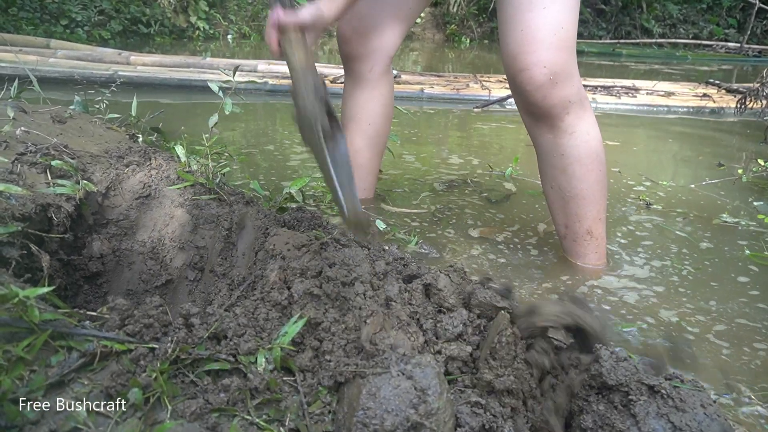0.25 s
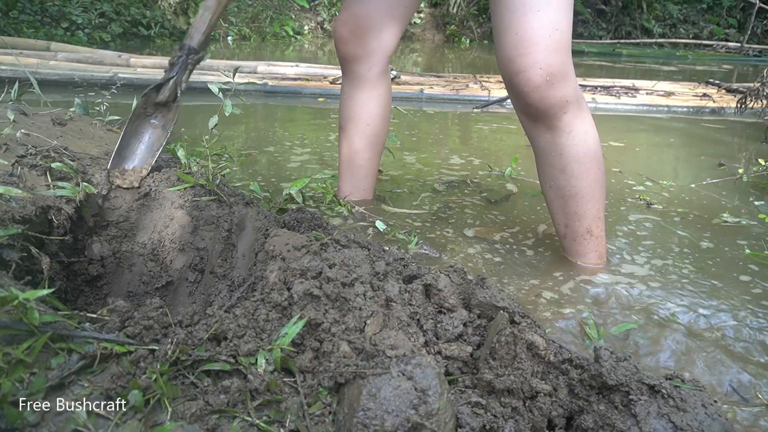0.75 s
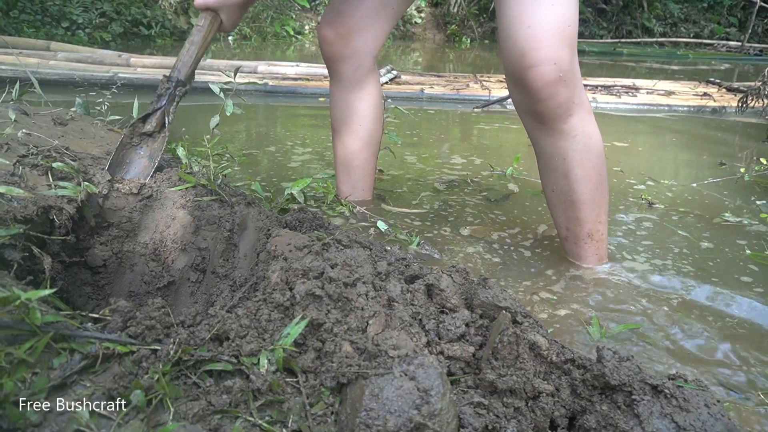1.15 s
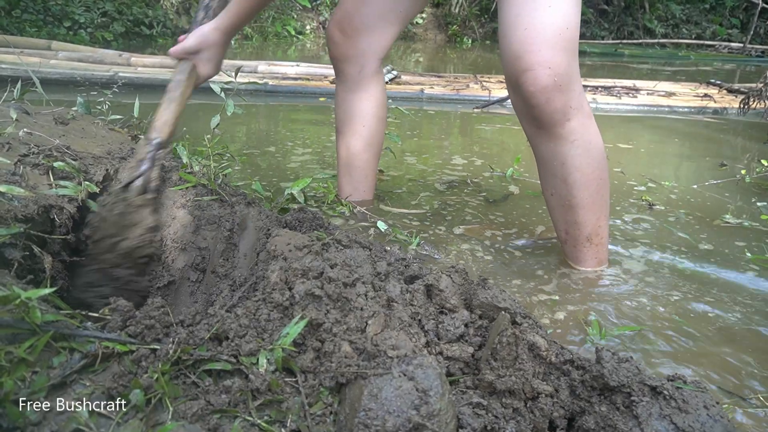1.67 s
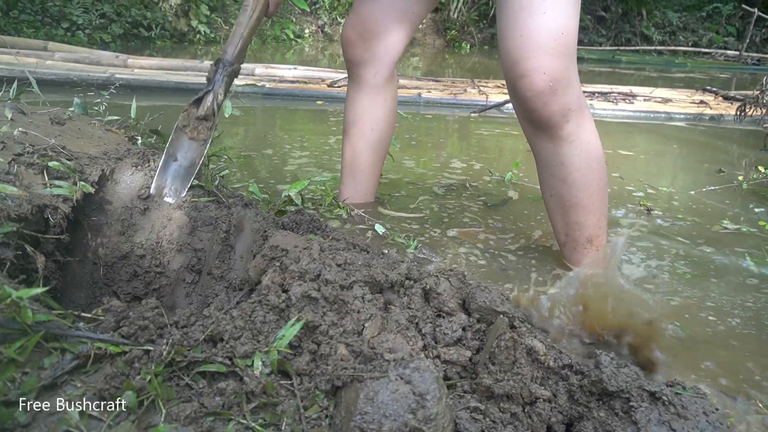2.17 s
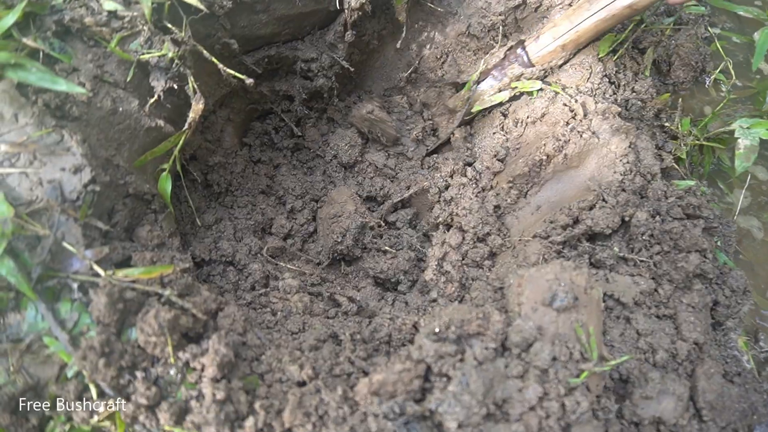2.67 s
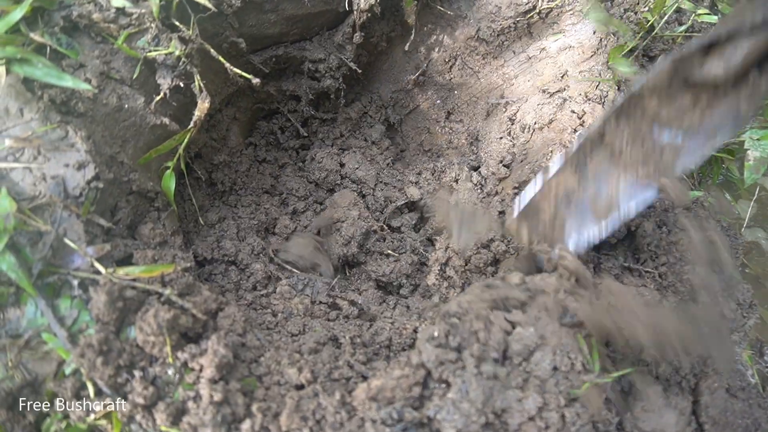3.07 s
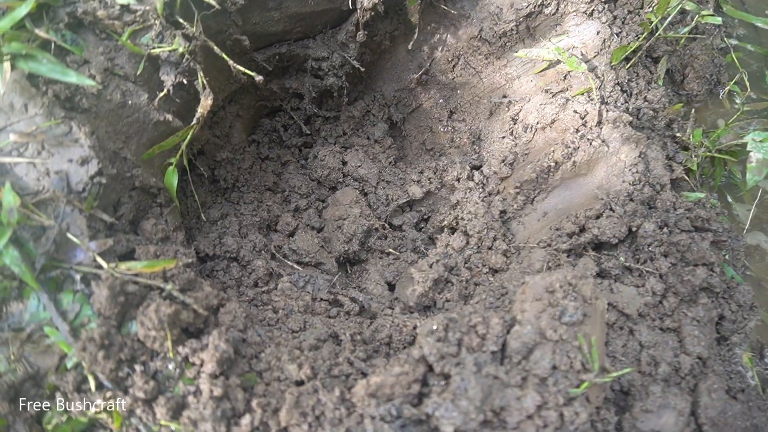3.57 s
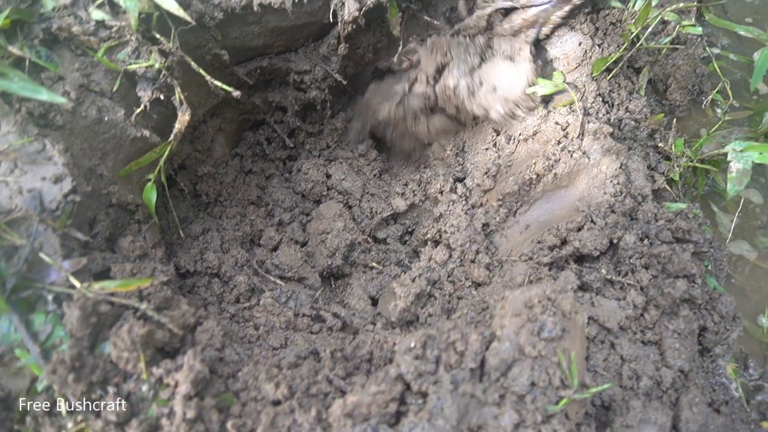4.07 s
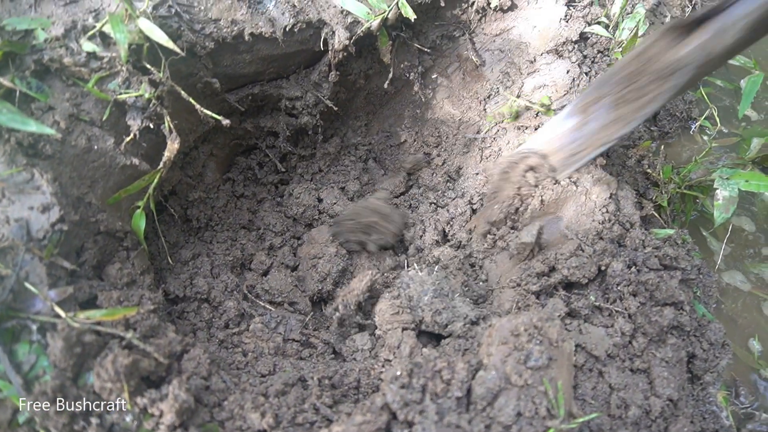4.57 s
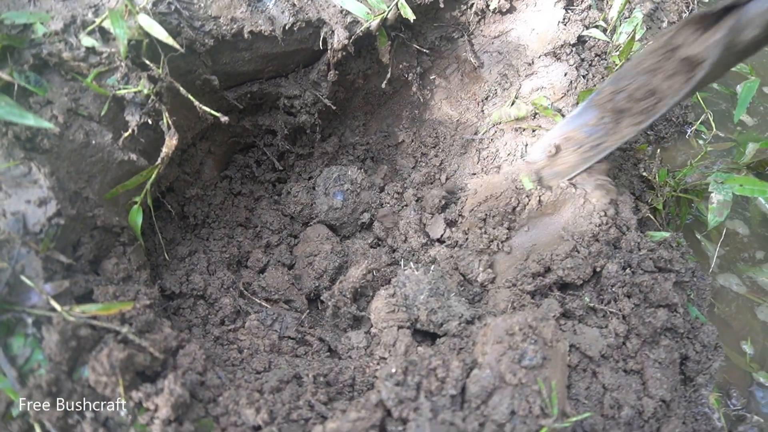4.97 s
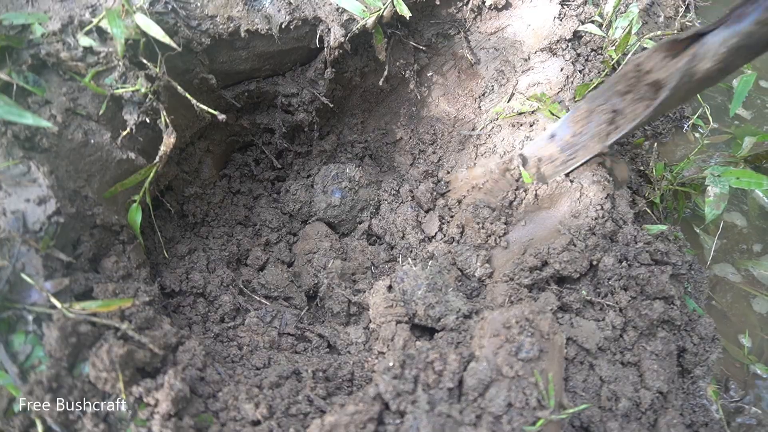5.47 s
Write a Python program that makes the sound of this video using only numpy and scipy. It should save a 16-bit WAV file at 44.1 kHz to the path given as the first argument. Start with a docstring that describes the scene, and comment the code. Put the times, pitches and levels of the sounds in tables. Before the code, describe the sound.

Outdoors beside a quiet stream, a clod of mud splashes into water, then a nearby spade chops twice into clay with a damped clank and thud. A second splash follows, and all sound cuts out for an instant. Digging resumes with rasping scrapes, three more chops, wet slaps and a hissing shower of crumbs. Two insects sing faintly and high in the background.

```python
"""A narrow steel spade on a wooden shaft chops and scrapes into a wet mud bank beside a stream.
Each chop clanks the blade, thuds in the clay and shakes the shaft; grit rasps along the steel.
Flung clods slap on the heap or splash into the water, ringing bubbles, and crumbs patter down.
Behind it the stream murmurs and two insects sing thinly. Everything drops out once, for an instant."""
import sys
import numpy as np
from scipy import signal
from scipy.fft import rfft, irfft, next_fast_len
from scipy.io import wavfile
from scipy.ndimage import uniform_filter1d, map_coordinates

SR = 44100
rng = np.random.default_rng(int(sys.argv[2]) if len(sys.argv) > 2 else 0)


def to_wav(sig):
    """Store sig (one row per channel, or 1-D mono) as 16-bit WAV at the path in sys.argv[1].

    Samples outside -1..1 are clipped; the rate is SR.
    """
    pcm = np.clip(np.atleast_2d(sig), -1, 1) * 32767
    pcm = np.round(pcm).astype(np.int16)
    wavfile.write(sys.argv[1], SR, pcm.T)  # frames by channels


N = 252693
T = np.arange(N) / SR
AGE = T[:SR // 2]  # seconds into a one-shot

# Levels in the cue tables are fader settings; each layer adds its own trim.
# Spade hits. Each row: start in seconds, clank, thud and shaft levels in dB, base pitch of the thud's
# sweep in Hz, pan in dB (left over right), rasp and grit levels of the slide into the clay in dB.
CHOPS = [(0.7216, -15.5, -15.5, -28, 253, -14, -34, -35.5), (1.4002, -14, -14, -29, 272, -15.5, -26, -37.5),
         (3.12, -22, -9.5, -26, 408, 7, -35, -35), (3.996, -11.5, -13.5, -24, 450, 4.5, -28.5, -33),
         (5.1789, -16.5, -13, -24.5, 393, 10, -43, -39)]
# Ringing modes. Each row: pitch in Hz, level in dB, time to fall 60 dB (t60) in seconds.
BLADE_MODES = [(663, -15.5, 0.09), (853, -14, 0.023), (1063, -7, 0.033), (1367, -6, 0.022),
               (1472, 2.5, 0.026), (2043, -15.5, 0.16), (2370, -19.5, 0.14), (2700, 11, 0.0078),
               (2867, 7, 0.021), (3150, -4, 0.031), (3550, -3, 0.039), (5640, -11.5, 0.044)]  # steel damped by clay
SHAFT_MODES = [(47.7, -9, .16), (67, -4.5, 0.3), (101, -2, 0.27), (144.8, 1.5, 0.28), (217, 4.5, 0.11),
               (356, -8, 0.3)]  # the shaft and the ground under it
# The blade pushed through soil. Each row: moment of top speed, rise and fall in seconds,
# then rasp, grit and singing levels in dB.
STROKES = [(.94, 0.14, 0.13, -44.5, -53, -62), (1.391, 0.22, 0.021, -35, -43.5, -48),
           (2.394, 0.012, 0.14, -25, -31, -29), (3.408, 0.043, 0.027, -33.5, -33.5, -58),
           (3.52, 0.11, 0.063, -42, -48, -67), (3.701, 0.12, 0.1, -29.5, -36.5, -41),
           (3.796, 0.077, 0.11, -27, -35.5, -37.5), (3.866, 0.064, 0.051, -22, -29, -35),
           (4.19, 0.053, 0.057, -40, -42.5, -50), (4.29, 0.038, .16, -51, -47, -57),
           (4.56, 0.07, 0.056, -38.5, -41.5, -65), (4.684, .12, 0.03, -26, -30, -38),
           (4.87, 0.075, .15, -40.5, -39, -52), (4.971, 0.057, 0.077, -44.5, -47.5, -70),
           (5.145, 0.08, 0.12, -21.5, -26.5, -29.5), (5.405, 0.23, 0.15, -40, -41.5, -62),
           (5.612, 0.066, 0.042, -26.5, -27.5, -43)]
# Resonances of the rubbed blade. Each row: centre in Hz, width in Hz, boost or cut in dB.
STEEL_RESONANCES = [(1320, 150, 2.5), (1680, 440, 5), (2010, 520, 4), (3240, 840, 4.5), (4700, 220, -10)]
# The free part of the blade sings when rubbed. Each row: pitch in Hz, level in dB.
SINGING_MODES = [(2230, 0), (4700, -1.5)]
# Soft knocks on earth. Each row: start in seconds, knock level in dB, its pitch in Hz, ground level in dB.
BUMPS = [(.65, -43, 620, -41), (2.386, -31.5, 287, -34.5), (2.855, -41.5, 570, -40.5),
         (2.995, -44, 402, -46), (3.28, -40.5, 343, -65), (4.34, -42, 450, -52), (4.674, -31.5, 288, -37),
         (5.615, -49, 300, -35.5)]
# Wet slaps of clods and blade. Each row: start in seconds, then smack, body and spray levels in dB.
SLAPS = [(0.137, -34, -35, -35), (0.3009, -14, -30.5, -17), (0.3191, -15.5, -31.5, -19),
         (0.3506, -24, -50, -20), (0.3582, -12.5, -38, -27), (0.3758, -20, -59, -30),
         (0.51, -24.5, -29, -25.5), (0.5459, -21, -37, -29), (1.2164, -26.5, -40, -38),
         (1.272, -29, -38.5, -38), (1.4134, -37, -28.5, -46), (1.7387, -26, -55, -58),
         (2.097, -15.5, -41, -15.5), (2.1823, -25, -35, -43), (2.2089, -36, -53, -36),
         (2.2284, -28, -48, -22), (2.386, -10.5, -28.5, -20.5), (2.452, -10, -19.5, -46),
         (2.7125, -27, -27.5, -19), (2.8444, -24.5, -35, -32), (2.903, -29, -41, -35),
         (2.9948, -14, -25, -13), (3.2735, -29, -56, -20), (3.6524, -19, -42, -29),
         (3.803, -12, -20.5, -37), (4.036, -19, -26, -38), (4.177, -30, -39, -31), (4.687, -15, -40, -45),
         (4.704, -17.5, -31, -48), (5.6029, -15.5, -49, -14.5), (5.6219, -8, -37, -34)]
# Churned water. Each row: start and end in seconds, opening level in dB.
SPLASHES = [(0.304, 0.379, -24.5), (2.093, 2.303, -37)]
# Big air pockets closing in the water. Each row: start in seconds, level in dB, opening pitch in Hz,
# rise in octaves per second, t60 in seconds.
BIG_BUBBLES = [(.136, -28, 750, 12, 0.026), (.32, -26, 1846, 3, 0.12), (.413, -16, 720, 5.4, 0.026),
               (.513, -20, 544, 8, 0.023), (2.144, -17.5, 2060, 2.6, 0.029), (2.15, -24, 498, 11, 0.045),
               (2.209, -18, 1700, 8, 0.017), (2.256, -19, 735, 42, 0.09)]
# Soil and drops coming down. Each row: start and length in seconds, patter and shower levels in dB.
FALLS = [(0.132, 0.2, -46.5, -63), (0.29, .2, -43.5, -32.5), (1.748, 0.13, -48.5, -67),
         (2.089, 0.33, -40, -55), (2.715, .2, -43.5, -34), (2.992, 0.6, -70, -19.5)]
# The stream's fader ride. Each row: time in seconds, level in dB.
STREAM_LEVELS = [(0, -47), (2.35, -47), (2.4, -44), (4.4, -44), (5.73, -46)]
# The insects' fader ride. Each row: time in seconds, levels of the low and the high song in dB.
INSECT_LEVELS = [(0, -58, -60), (.9, -58, -55.5), (1.3, -69, -71), (2, -56.5, -62), (3.3, -57, -54),
                 (3.98, -49, -68), (4.3, -59, -67), (5.73, -50, -64)]
# Tone colours of the noise layers. Each row: frequency in Hz, relative level in dB.
CLANK_EQ = [(300, -10), (700, -27), (1500, 8), (3400, -1), (4300, -5), (9000, -10), (16000, -47)]
EARTH_EQ = [(20, -10), (50, 3), (130, 6.5), (220, 8.5), (330, -6), (700, -42)]
RASP_EQ = [(59, -55), (100, -9), (184, -15.5), (274, -9), (407, -3), (633, -7), (764, -8), (1920, -6),
           (2270, -3.5), (2520, -1.5), (4640, 0), (5260, 0.5), (15000, -10)]
GRIT_EQ = [(2500, -15.5), (6000, -0.5), (9000, 0.5), (16000, -5.5)]
SMACK_EQ = [(400, -25.5), (1000, -2.5), (2000, 4), (3500, 1), (6000, -3), (10000, -69)]
MUD_EQ = [(60, -22), (200, -6), (450, 0.5), (800, -7), (1500, -10), (4000, -21)]
CHURN_EQ = [(300, -32), (700, 14), (1100, -1), (1850, -6.5), (2600, -4), (5000, 7), (9000, -26),
            (16000, -69)]
PATTER_EQ = [(250, -23), (600, -12.5), (2500, 3), (6000, -2.5), (16000, -9)]
SHOWER_EQ = [(1500, -22.5), (4000, -16), (9000, -9), (15000, -6)]
STREAM_EQ = [(15, -58), (25, -14.5), (123, -6.5), (190, -9), (734, -7.5), (840, -10), (1190, -12.5),
             (1940, -13), (4140, -14.5), (4870, -18), (5430, -17), (14800, -20.5)]
GURGLE_EQ = [(150, -10.5), (430, 1), (750, -1.5), (2000, -20)]
# Stereo width of the noise. Each row: frequency in Hz, likeness of left and right (1 is mono).
STEREO_LIKENESS = [(120, .998), (260, .98), (500, .94), (1000, .83), (2400, .68), (6000, .42), (15000, .27)]
# Placement of scrapes and flying mud. Each row: frequency in Hz, pan in dB (left over right).
SOIL_PAN = [(200, 5.5), (450, -1), (1200, -4.5), (2400, -6), (4400, -3.5), (15000, -3.5)]
# The tail off the bank and bushes. Each row: frequency in Hz, t60 in seconds.
BANK_DECAY = [(100, 0.6), (1000, 0.69), (4000, 0.31), (14000, 0.31)]


def chops():
    """The blade clanks, the clay gives way with a sinking thud, the shaft shudders on."""
    out = np.zeros((2, N))
    for start, clank_db, thud_db, shaft_db, thud_hz, pan_db, *_ in CHOPS:
        steel = ring(BLADE_MODES, attack=0.0024, scatter_db=2.5)
        clash = hiss(CLANK_EQ) * fade(t60=0.028, attack=0.0012)
        add(out, start, amp(clank_db) * (0.65 * steel + 0.8 * clash), pan_db)
        pitch = thud_hz * (0.585 + 0.46 * np.exp(-AGE / 0.02))
        thud = 2.54 * glide(pitch) * fade(t60=0.032, attack=0.0039)
        crush = 0.4 * hiss(MUD_EQ) * fade(t60=0.17, attack=0.00072)
        add(out, start, amp(thud_db) * (thud + crush))
        grip = np.exp(0.0274 * rng.normal())  # hands and clay hold the shaft differently each time
        shudder = ring([(hz * grip, db, t60) for hz, db, t60 in SHAFT_MODES], attack=0.004)
        earth = 0.5 * hiss(EARTH_EQ) * fade(t60=0.57, attack=0.0035)
        add(out, start + 0.00604, amp(shaft_db - 0.5) * (shudder + earth))
    return out


def slide(start, delay=0.011, attack=0.0055, t60=0.47):
    """Envelope of the blade running on into the clay after a chop and slowing down."""
    age = np.maximum(T - start - delay, 0)
    return (1 - np.exp(-age / attack)) * np.exp(-np.log(1000) * age / t60)


def stroke(peak, rise, fall, swell_db=18.5, lift_s=0.0042):
    """Envelope of one push: the blade speeds up, slows and lifts off, in straight dB ramps."""
    from_peak = np.maximum((peak - T) / rise, (T - peak) / fall)
    lifted = np.maximum(np.maximum(peak - rise - T, T - peak - fall), 0)
    return amp(-swell_db * from_peak) * np.exp(-lifted / lift_s)


def rubbed_steel(hz):
    """The blade's resonances as a filter, with the top end rolled off."""
    peaks = sum((amp(db) - 1) * 1j * hz * width / (centre ** 2 - hz ** 2 + 1j * hz * width)
                for centre, width, db in STEEL_RESONANCES)
    return (1 + peaks) / (1 + (hz / 7000) ** 4)


def scrapes():
    """Grit sticks and slips along the blade and sets the steel singing."""
    slide_rasp, slide_grit = sum(np.outer(amp([rasp_db, grit_db]), slide(start))
                                 for start, *_, rasp_db, grit_db in CHOPS)
    push_rasp, push_grit, push_sing = sum(np.outer(amp(levels), stroke(peak, rise, fall))
                                          for peak, rise, fall, *levels in STROKES)
    rasp = spread(grains(per_second=3500, scatter_db=2.5, bed=0.69), RASP_EQ)
    rasp = cavities(unit(filtered(rasp, rubbed_steel)), depth_db=4)
    grit = amp(3.5) * spread(grains(per_second=3000, scatter_db=3.5, bed=0.64), GRIT_EQ)
    slips = flutter(110, depth_db=1.2)
    singing = sum(amp(db) * flutter(12, depth_db=2) * whistle(hz, width=130) for hz, db in SINGING_MODES)
    return slips * ((push_rasp + slide_rasp) * rasp + (push_grit + slide_grit) * grit + push_sing * singing)


def bumps(ground_hz=100):
    """Clods and blade land softly: a dull knock over a low answer from the ground."""
    out = np.zeros((2, N))
    tone = lambda hz: np.sin(2 * np.pi * hz * AGE) + 0.41 * np.sin(2 * np.pi * 1.4 * hz * AGE)
    for start, knock_db, knock_hz, ground_db in BUMPS:
        knock = amp(knock_db) * tone(knock_hz) + amp(ground_db) * tone(ground_hz)
        add(out, start, 3 * knock * fade(t60=0.078, attack=0.002))
    return out


def slap(smack_db, body_db, spray_db):
    """Wet mud lands: a sharp smack, a duller body and a flick of spray."""
    smack = amp(smack_db - 6) * hiss(SMACK_EQ) * fade(t60=0.039, attack=0.00016)
    body = amp(body_db + 4) * hiss(MUD_EQ) * fade(t60=0.022, attack=0.00033)
    spray = amp(spray_db) * hiss(GRIT_EQ) * fade(t60=0.03, attack=0.00086)
    return smack + body + spray


def clods():
    """The big clods slap down one by one; four stray lumps land at random during each fall."""
    out = np.zeros((2, N))
    for start, *levels in SLAPS:
        add(out, start, slap(*levels))
    for start, length, patter_db, _ in FALLS:
        for when, weakness in rng.random(size=(4, 2)):
            db = patter_db + 12 - 8 * weakness
            add(out, start + when * length, slap(db, body_db=db - 5, spray_db=db - 3))
    return out * flutter(1200, depth_db=0.7)


def splashes(calming_db=13, linger_s=0.13):
    """Clods churn the water; big and small bubbles ring in it and go on popping a while."""
    out = np.zeros((2, N))
    churn = cavities(hiss(CHURN_EQ, N), depth_db=12.5)
    for start, db, hz, rise, t60 in BIG_BUBBLES:
        add(out, start, amp(db) * bubble(hz, rise, t60))
    for start, end, db in SPLASHES:
        out += fader([(start, db), (end, db - calming_db)]) * churn
        for when, smallness, strength, side in rng.random(size=(34, 4)):
            hz = 900 * 5 ** smallness
            pop = amp(-47 + 10 * strength) * bubble(hz, rise=8.5, t60=45 / hz)
            add(out, start + when * (end + linger_s - start), pop, pan_db=8 * (side - 0.5))
    return out * flutter(400, depth_db=2.7)  # the moving water shakes the bubbles


def bubble(hz, rise, t60):
    """A bubble's pitch rises as it nears the surface, by two octaves at most."""
    pitch = hz * 2 ** np.minimum(rise * AGE, 2)
    return glide(pitch) * fade(t60, attack=0.0007)


def cavities(sound, depth_db):
    """Small cavities open and close in the mud, so short-lived resonances come and go."""
    bands = signal.stft(sound, nperseg=512)[2]
    patches = uniform_filter1d(rng.standard_normal(bands.shape[1:]), size=3, axis=0)  # across pitch
    patches = uniform_filter1d(patches, size=5, axis=1)  # across time
    return unit(signal.istft(bands * amp(depth_db * unit(patches)), nperseg=512)[1][:, :N])


def crumbs():
    """Drops and crumbs patter down after a throw; the finest fall as a hissing shower."""
    out = np.zeros((2, N))
    patter = spread(grains(per_second=1400, scatter_db=3, bed=0.38), PATTER_EQ)
    patter = cavities(patter, depth_db=1) * flutter(70, depth_db=4.4)
    for start, length, patter_db, shower_db in FALLS:
        out += amp(1) * fader([(start, patter_db), (start + length, patter_db)]) * patter
        add(out, start, amp(shower_db + 3) * hiss(SHOWER_EQ) * fade(t60=0.29, attack=0.0073))
    return out


def stream():
    """Water murmurs along the bank, with a restless low gurgle inside it."""
    murmur = hiss(STREAM_EQ, N) * flutter(10, depth_db=0.8)
    gurgle_db = -8.5 + 3 * np.clip(wobble(22.134), -2, 1.5)
    return fader(STREAM_LEVELS) * (murmur + amp(gurgle_db) * hiss(GURGLE_EQ, N))


def insects():
    """Two insects sing in the bushes, each a thin, wavering band of noise."""
    low, high = fader(INSECT_LEVELS) * [flutter(5.64, depth_db=1.5), flutter(3.9, depth_db=1.5)]
    return low * whistle(4780, width=220) + high * whistle(9150, width=450)


def bank_echo(sound):
    """The bank and the bushes scatter back a short tail, thin in the bass."""
    treble = filtered(sound, lambda hz: hz / (hz + 900))
    hz, age, bands = signal.stft(rng.standard_normal((2, SR // 2)), SR, nperseg=256)
    decay = np.exp(-np.log(1000) * age / along(BANK_DECAY, hz)[:, None])
    tail = signal.istft(bands * decay, SR, nperseg=256)[1]
    return signal.fftconvolve(treble, tail / np.linalg.norm(tail[0]), axes=1)[:, :N]


def ring(modes, attack, scatter_db=0):
    """Struck, damped modes; scatter_db varies their strengths from hit to hit."""
    return sum(amp(db - scatter_db * rng.normal()) * fade(t60, attack)
               * np.sin(2 * np.pi * (hz * AGE + rng.random())) for hz, db, t60 in modes)


def glide(pitch):
    """A sine that follows a pitch curve in Hz."""
    return np.sin(2 * np.pi * np.cumsum(pitch) / SR)


def grains(per_second, scatter_db, bed):
    """Tiny random fractures of uneven size on a bed of noise."""
    clicks = (rng.random(N) < per_second / SR) * amp(scatter_db * np.clip(rng.standard_normal(N), -2, 2))
    return unit(clicks * rng.choice([-1, 1], (2, N))) + bed * rng.standard_normal((2, N))


def hiss(eq, samples=len(AGE)):
    """Coloured stereo noise of rms 1, one-shot length by default."""
    return spread(rng.standard_normal((2, samples)), eq)


def whistle(hz, width):
    """Stereo noise in one resonance, 10 dB down at width Hz to either side."""
    return hiss([(hz / 2, -120), (hz - 4 * width, -30), (hz - width, -10), (hz, 0),
                 (hz + width, -10), (hz + 4 * width, -30), (2 * hz, -120)], N)


def spread(pair, eq):
    """Colour two unrelated signals into stereo of rms 1: centred bass, wide treble."""
    def mid_side(hz):
        angle = np.arccos(np.clip(along(STEREO_LIKENESS, hz), 0, 1)) / 2
        return amp(along(eq, hz)) * [np.cos(angle), np.sin(angle)]
    mid, side = filtered(pair, mid_side)
    return unit(np.array([mid + side, mid - side]))


def filtered(sound, response):
    """Shape a sound with a gain that depends on frequency."""
    size = sound.shape[-1]
    padded = next_fast_len(size + 8192)
    return irfft(rfft(sound, padded) * response(np.fft.rfftfreq(padded, 1 / SR)), padded)[..., :size]


def along(points, hz):
    """Read a curve on a log frequency axis."""
    knots, values = np.transpose(points)
    return np.interp(np.log(hz + 1), np.log(knots + 1), values)


def fade(t60, attack):
    """One-shot envelope: a rise, then an exponential decay; times in seconds."""
    return np.exp(-np.log(1000) * AGE / t60) * (1 - np.exp(-AGE / attack))


def fader(rows):
    """A gain ride for each dB column, closing quickly outside its times."""
    times, *columns = np.transpose(rows)
    gate = np.interp(T, [times[0] - 0.012, times[0], times[-1], times[-1] + 0.02], [0, 1, 1, 0])
    return np.array([gate * amp(np.interp(T, times, db)) for db in columns])


def wobble(rate):
    """A smooth random curve, rate knots a second."""
    return map_coordinates(rng.standard_normal(int(N * rate / SR) + 4), [T * rate])


def flutter(rate, depth_db):
    """A gain that wavers at random around 1."""
    return amp(depth_db * wobble(rate))


def amp(db):
    """Decibels to gain."""
    return 10 ** (np.asarray(db) / 20)


def unit(sound):
    """Scale to rms 1."""
    return sound / np.sqrt(np.mean(sound ** 2) + 1e-20)


def add(track, start, sound, pan_db=0):
    """Drop a one-shot in at start seconds; positive pan leans left."""
    i = max(round(start * SR), 0)
    track[:, i:i + len(AGE)] += (sound * amp([[pan_db / 2], [-pan_db / 2]]))[:, :N - i]


def scene():
    """Spade up front, the soil's mids and highs a little to the right, stream and insects behind."""
    soil = scrapes() + splashes() + crumbs() + clods()
    soil = filtered(soil, lambda hz: amp(np.outer([0.5, -0.5], along(SOIL_PAN, hz))))
    digging = chops() + bumps() + soil
    return digging + amp(-13) * bank_echo(digging) + stream() + insects()


def record(dry):
    """The mix drops out for an instant, and a steep cut removes the air above 16 kHz."""
    dropout = np.interp(T, [2.34, 2.363, 2.382, 2.384], [1, 0, 0, 1])
    return filtered(dry * dropout, lambda hz: 1 / (1 + (hz / 16000) ** 200))


dry = scene()
out = record(dry)
to_wav(out)
```